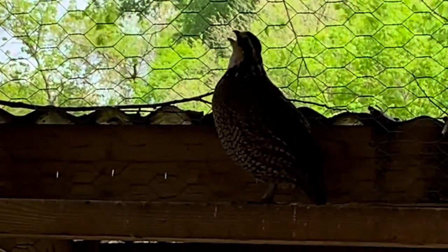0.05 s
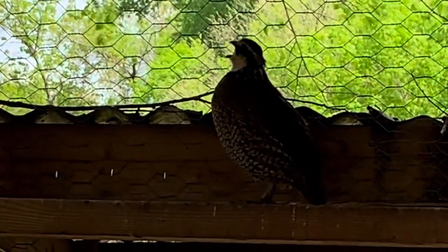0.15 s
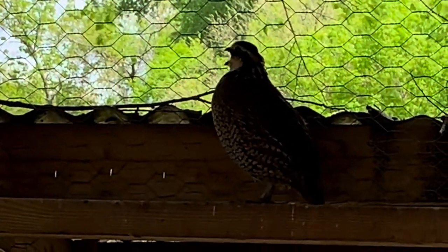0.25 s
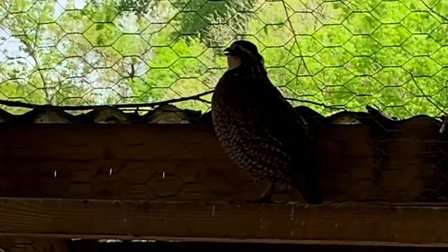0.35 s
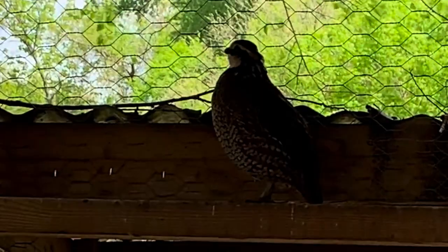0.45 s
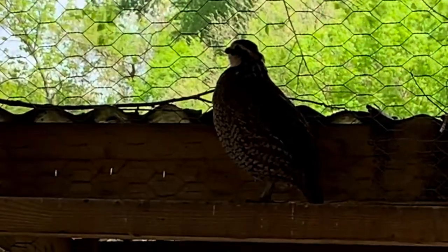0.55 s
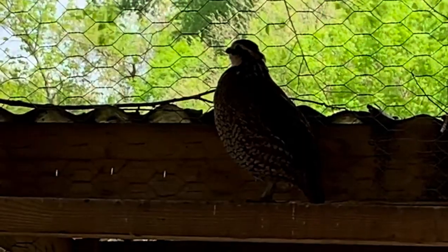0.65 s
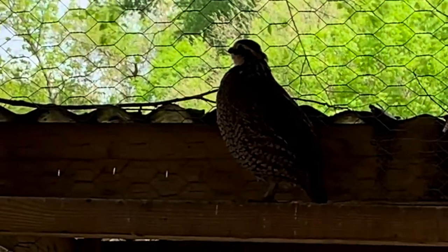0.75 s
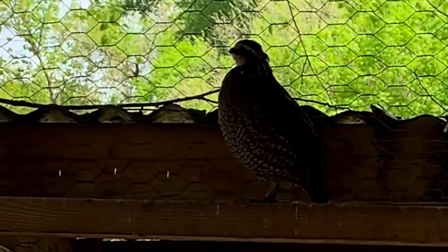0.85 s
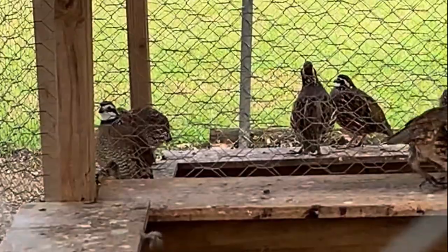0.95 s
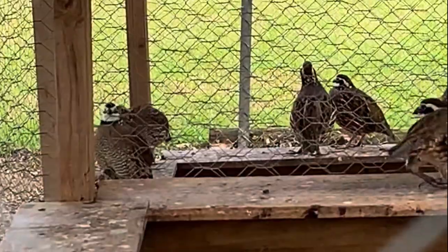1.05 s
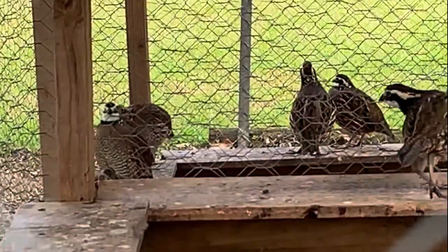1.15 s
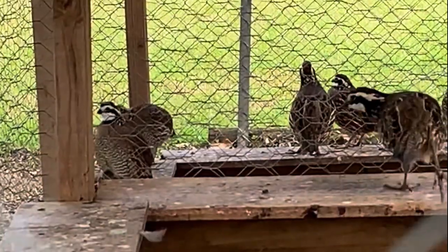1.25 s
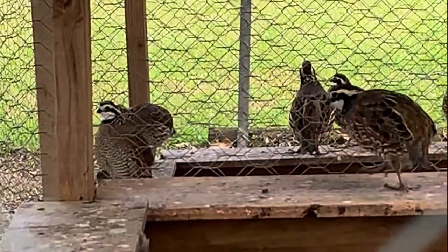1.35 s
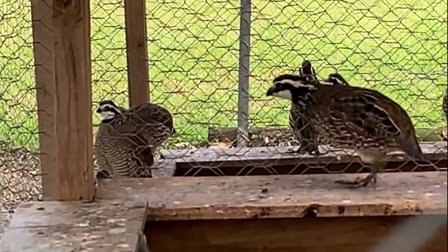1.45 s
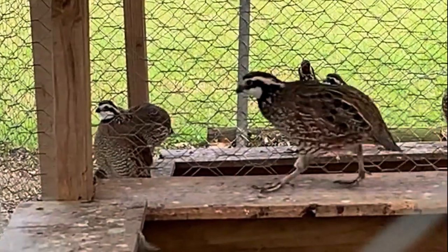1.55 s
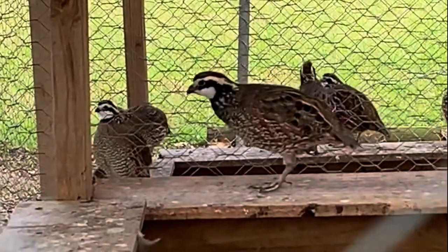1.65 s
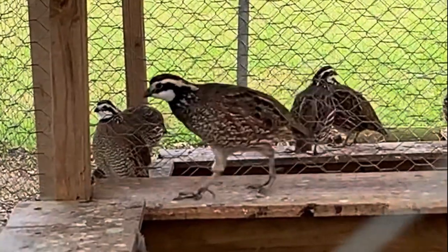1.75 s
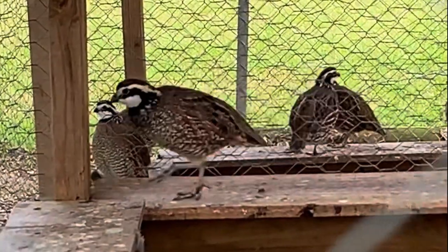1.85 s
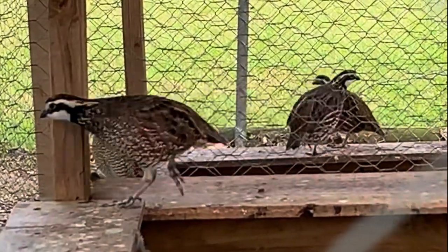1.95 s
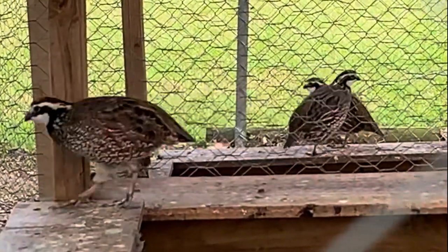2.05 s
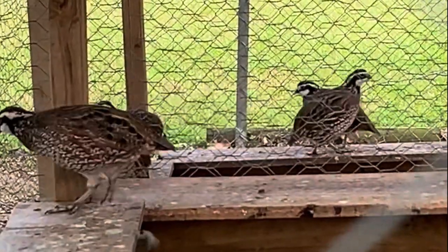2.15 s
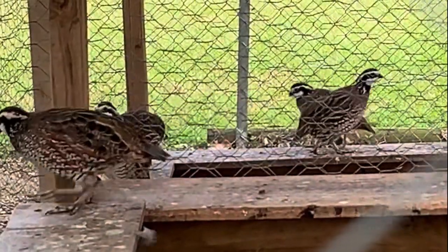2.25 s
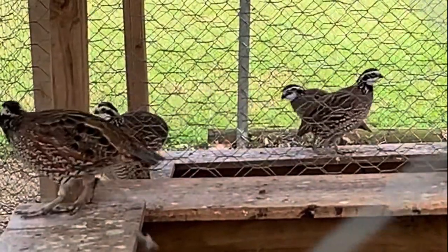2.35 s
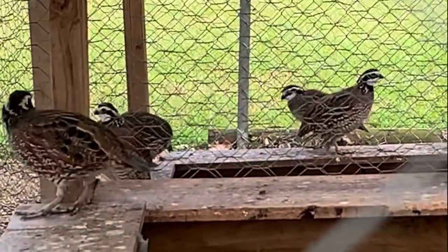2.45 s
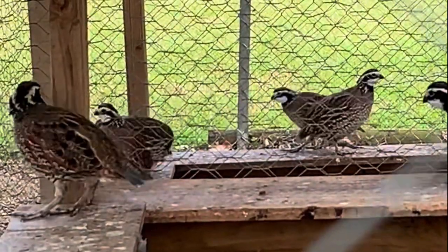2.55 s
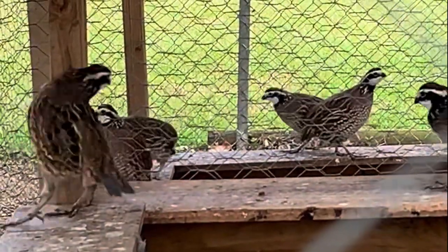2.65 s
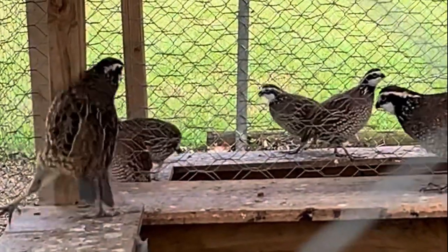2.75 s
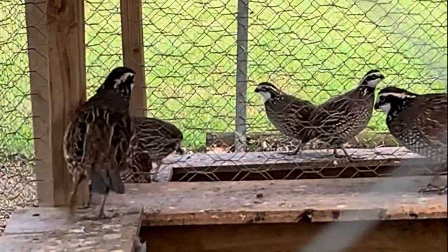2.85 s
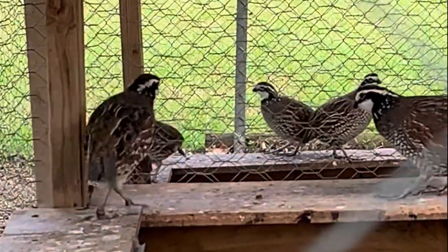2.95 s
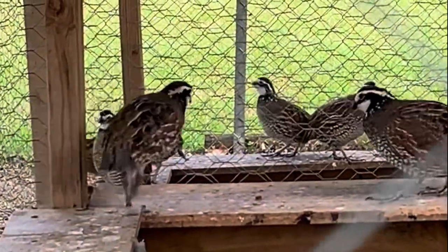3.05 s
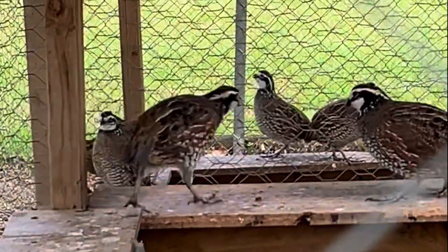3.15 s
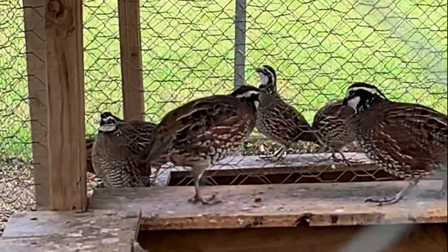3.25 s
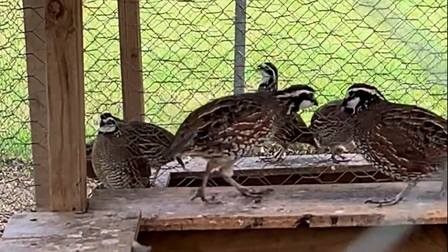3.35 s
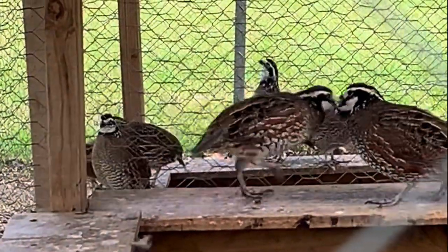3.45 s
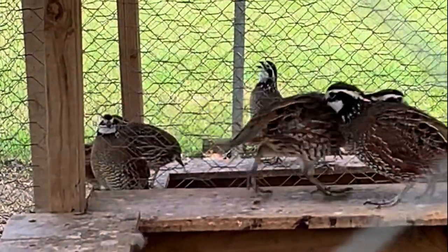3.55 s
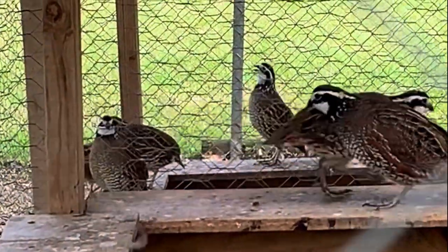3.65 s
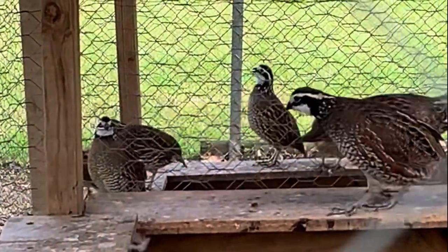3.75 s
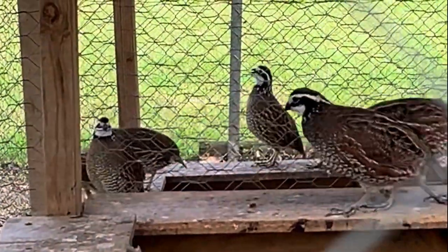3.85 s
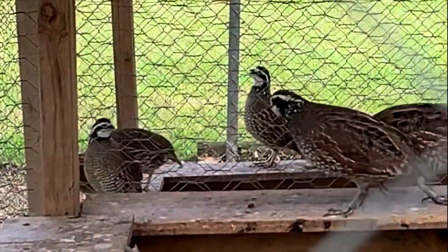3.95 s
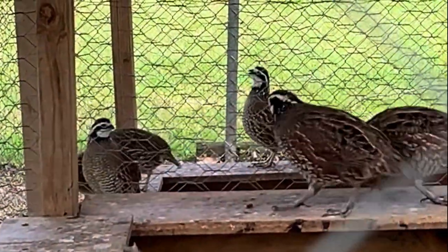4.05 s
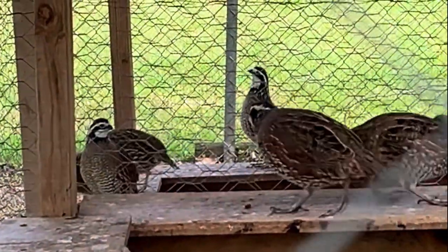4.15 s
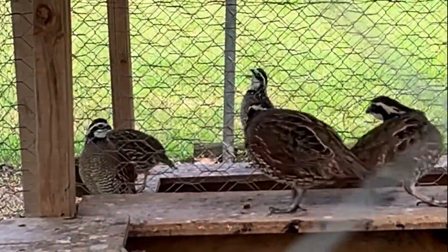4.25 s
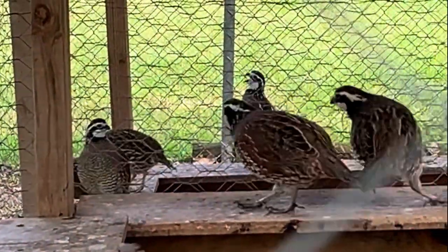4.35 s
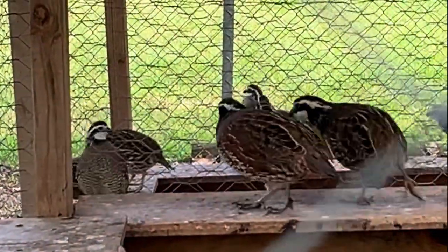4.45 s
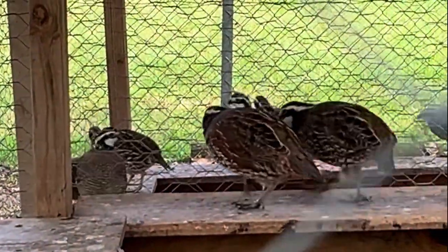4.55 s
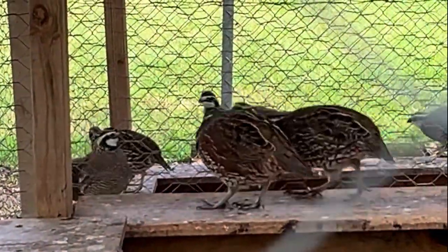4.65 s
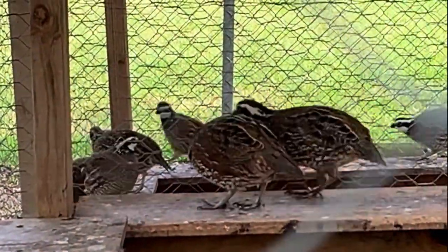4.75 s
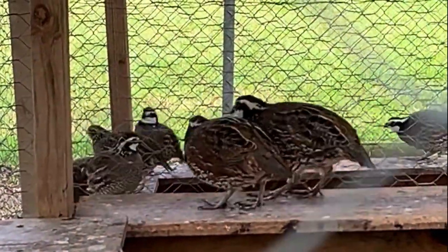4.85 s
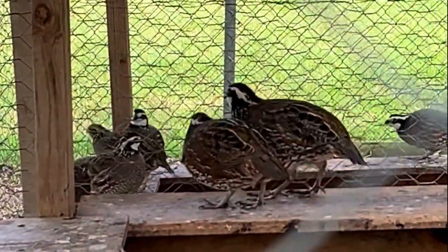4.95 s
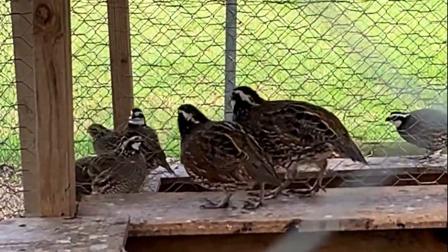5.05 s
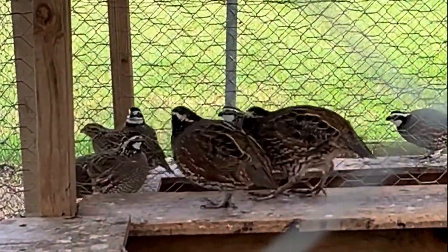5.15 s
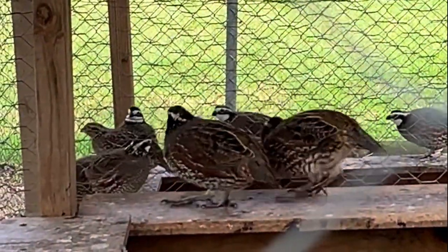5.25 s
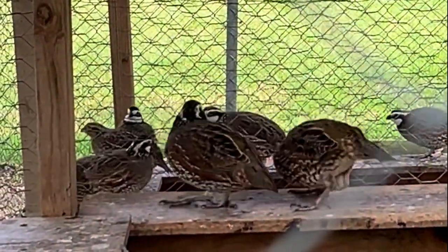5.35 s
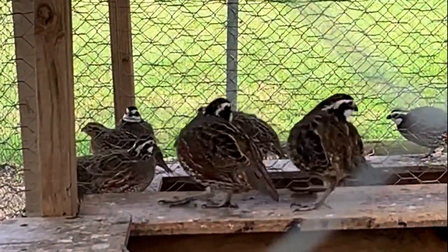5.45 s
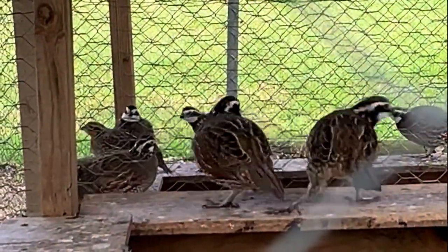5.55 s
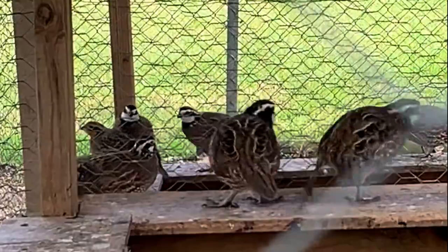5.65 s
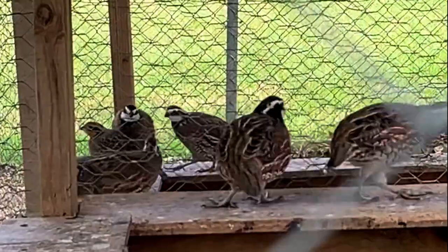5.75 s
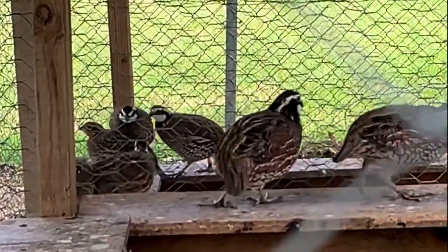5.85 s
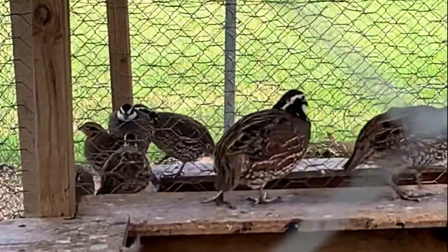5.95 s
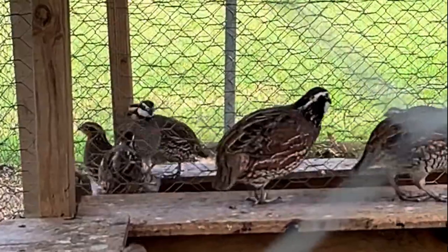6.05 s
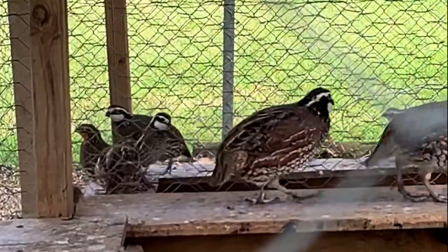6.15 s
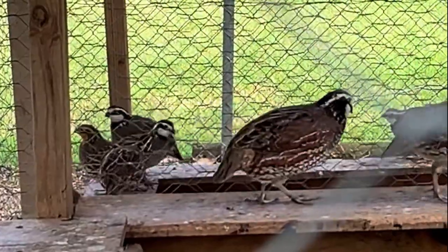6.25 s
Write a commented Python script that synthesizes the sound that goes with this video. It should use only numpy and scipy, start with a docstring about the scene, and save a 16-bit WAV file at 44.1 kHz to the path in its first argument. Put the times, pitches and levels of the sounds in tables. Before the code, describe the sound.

A quail's loud rising whistle cracks into a hoarse fall, then soft quick chirps and coos patter until two more sharp whistles ring out.

```python
"""Bobwhite quail in a wood and wire pen on a farm. A loud rising whistle opens and breaks into a hoarse fall.
At 0.9 s the background dips; from 1.1 s come three-part chirps and arched coos, with a faint far whistle at 2.7 s.
Loud whistles return at 3.5 and 4.2 s, the last breaking briefly, and two more chirps close. Voices are harmonic
stacks on gliding pitches, answered by boards and far walls; thin high notes and a 6 kHz scratch are sines.
Throughout, noise clicks make claw ticks and dull knocks, and shaped noise a flickering treble, air and low rumble."""
import sys
import numpy as np
from scipy import signal
from scipy.fft import rfft, irfft, next_fast_len
from scipy.io import wavfile
from scipy.ndimage import uniform_filter1d, minimum_filter1d, map_coordinates

SR = 44100
rng = np.random.default_rng(int(sys.argv[2]) if len(sys.argv) > 2 else 0)


def int16_out(signal):
    """Quantize to a 16-bit WAV file."""
    q = np.round(np.clip(np.atleast_2d(signal).T, -1, 1) * 32767)
    wavfile.write(sys.argv[1], SR, q.astype(np.int16))


N = 277830  # samples, 6.3 s

# Whistles, three near and one far; upsweep_hz may be negative, levels are before the pen's answer:
# start_s, length_s, pitch_hz, climb_hz_per_s, scoop_hz, upsweep_hz, onset_db, early_db, crest_db, end_db
WHISTLES = [(0.044, 0.13, 1676, 1953, 545.3, 743.5, -11.5, -18.5, -3.5, -7.5),
            (2.697, .14, 1565, -200, 110, 0.5, -55, -46, -49.5, -48.5),
            (3.519, .13, 1541, 1153, 181.5, -37.5, -17.5, -11.5, -13, -11),
            (4.224, 0.11, 1573, 2307, 304, 1077.5, -15.5, -7.5, -6.5, -9.5)]
# The voice breaking after a whistle; pitch_hz is where the plunge lands, before the sag:
# start_s, length_s, pitch_hz, burst_db, tail_db
BREAKS = [(0.169, 0.17, 1044, -15, -18.5), (4.331, 0.077, 832, -23.5, -28.5)]
# What throat and bill pass of a whistle's overtones, before a trim: frequency_hz, gain_db
WHISTLE_OVERTONES = [(2500, -18), (3400, -36), (4300, -22), (5000, -52), (6200, -44), (7200, -33.5),
                     (8000, -28), (9000, -41.5), (10000, -43), (12000, -57.5), (15000, -45.5)]
# What they pass of the broken voice, before a trim: frequency_hz, gain_db
HOARSE_COLOUR = [(800, -18.5), (1100, -9), (1700, -21.5), (2100, -17.5), (2600, 6), (3100, 1), (3700, -15),
                 (5500, -19), (7000, -28.5), (8500, -26), (11000, -33), (15000, -35.5)]


def whistles():
    """Almost pure gliding tones; after two of them the voice breaks into a falling, rough harmonic stack."""
    def whistle_colour(k, hz):
        return 0 if k == 1 else along(WHISTLE_OVERTONES, hz) - 1.5

    def hoarse_colour(k, hz):
        return along(HOARSE_COLOUR, hz) - 1

    out = np.zeros(N)
    for row in WHISTLES:
        call = syrinx(whistle(*row), whistle_colour,
                      jitter=.011, shimmer_db=1.1, rasp=.07, flutter_db=.3, hiss_db=-36)
        add(out, *call)
    for row in BREAKS:
        call = syrinx(voice_break(*row), hoarse_colour,
                      jitter=.022, shimmer_db=2.5, rasp=.14, flutter_db=2, hiss_db=-28)
        add(out, *call)
    return out


# a faint glide comes before the full voice
LEAD_IN_S, LEAD_IN_DB, ATTACK_S, RELEASE_S = .036, -25.5, 0.011, .009
SCOOP_S, SWEEP_S, SWEEP_BEFORE_END_S = 0.0046, .0068, .019
EARLY_SHARE, CREST_SHARE = 0.24, .55  # of a whistle's length


def whistle(s, length, hz, climb, scoop_hz, sweep_hz, onset_db, early_db, crest_db, end_db):
    """The pitch scoops up, drifts steadily and sweeps at the end: rows of start_s, pitch_hz, level_db."""
    t = np.arange(-LEAD_IN_S, length + RELEASE_S, 1 / SR)
    scoop = scoop_hz * step(-t / SCOOP_S)
    sweep = sweep_hz * step((t - length + SWEEP_BEFORE_END_S) / SWEEP_S)
    pitch = hz + climb * t - scoop + sweep
    faint_db = onset_db + LEAD_IN_DB
    level = envelope(
        t,
        (t[0], faint_db - 12.5), (-ATTACK_S / 2, faint_db),
        (ATTACK_S / 2, onset_db), (2 * ATTACK_S, onset_db),
        (EARLY_SHARE * length, early_db), (CREST_SHARE * length, crest_db),
        (length - 2 * SWEEP_BEFORE_END_S, end_db), (length - RELEASE_S / 2, end_db),
        (t[-1], end_db - 21))
    return np.column_stack([s + t, pitch, level])


BREAK_DROP_HZ, BREAK_DROP_S, BREAK_SAG_HZ_PER_S = 825, .024, 1280
BURST_ATTACK_S, BURST_S, BURST_RELEASE_S, BREAK_FADE_DB = .006, .02, .008, 17.5


def voice_break(s, length, hz, burst_db, tail_db):
    """A harsh burst on a plunging pitch, then a sagging, fading tail."""
    t = np.arange(0, length, 1 / SR)
    plunge = BREAK_DROP_HZ * np.exp(-(t / BREAK_DROP_S) ** 2)
    pitch = hz + plunge - BREAK_SAG_HZ_PER_S * t
    level = envelope(
        t,
        (0, burst_db - 13.5), (BURST_ATTACK_S, burst_db), (BURST_S, burst_db),
        (BURST_S + BURST_RELEASE_S, tail_db - 8),
        (length / 3, tail_db), (length, tail_db - BREAK_FADE_DB))
    return np.column_stack([s + t, pitch, level])


SKIRT_PER_PARTIAL = .11  # extra roughness of each higher partial


def syrinx(track_rows, partial_db, jitter, shimmer_db, rasp, flutter_db, hiss_db, count=12):
    """One call as (start s, sound): a harmonic stack on a gliding, slightly shaky pitch."""
    s, hz, db = np.transpose(track_rows)
    s = np.maximum.accumulate(s)
    t = np.arange(s[0], s[-1], 1 / SR)
    pitch = uniform_filter1d(np.interp(t, s, hz), size=160)
    # the membranes lose their steadiness in fast glides
    glide = uniform_filter1d(np.abs(np.gradient(np.log(pitch))) * SR, size=400)
    unsteady = 0.018 + np.minimum(glide / 9, 1)
    pitch = pitch * (1 + jitter * unsteady * wobble(700, len(t)))
    phase = 2 * np.pi * np.cumsum(pitch) / SR
    # bright hiss of air through the bill
    stack = amp(hiss_db) * unsteady * np.diff(rng.standard_normal(len(t) + 1))
    for k in range(1, count + 1):
        # turbulence spreads each partial into a noisy skirt, the high ones most
        roughness = rasp * (unsteady + SKIRT_PER_PARTIAL * (k - 1)) * k
        carrier = 1 + roughness * (wobble(1100, len(t)) + 1j * wobble(1100, len(t)))
        carrier = carrier / np.sqrt(np.mean(np.abs(carrier) ** 2))
        gain = amp(partial_db(k, k * pitch) + flutter_db * wobble(89.8, len(t)))
        gain = gain * (k * pitch < SR / 2)
        stack += gain * np.imag(carrier * np.exp(1j * k * phase))
    fade = np.clip(np.minimum(t - s[0], s[-1] - t) / 0.0018, 0, 1)
    level_db = np.interp(t, s, db) + shimmer_db * unsteady * wobble(400, len(t))
    return s[0], stack * fade * amp(level_db)


# Chirps, a sharp pit, a held note and a falling slur; levels are before the voice colour and waver:
# pit_s, start_pitch_hz, held_pitch_hz, pit_db, held_db, slur_start_s, slur_db
CHIRPS = [(1.142, 2060, 1246, -23, -26.5, 1.207, -33.5), (1.457, 2060, 1265, -25.5, -31, 1.529, -37.5),
          (1.792, 2060, 1250, -25.5, -31.5, 1.874, -38), (2.148, 2060, 1240, -24, -29.5, 2.221, -38.5),
          (2.487, 2100, 1263, -27, -31, 2.569, -37.5), (2.843, 2100, 1284, -27, -30.5, 2.916, -39),
          (3.188, 2060, 1312, -27, -33, 3.25, -57.5), (3.484, 2600, 2084, -28.5, -37.5, 3.592, -37.5),
          (3.775, 2800, 2420, -14.5, -43.5, 3.868, -45), (5.656, 2150, 1283, -42, -34.5, 5.724, -36),
          (6.008, 2200, 1268, -31, -31, 6.087, -41)]
# Arched coos, after the chirps and from the covey; length_s is the fall after the top:
# top_s, top_pitch_hz, length_s, droop_share, level_db
COOS = [(0.951, 853, 0.018, .05, -44), (1.102, 843, .06, 0.089, -49), (1.287, 903, .055, 0.24, -31.5),
        (1.638, 905, 0.045, 0.32, -33.5), (1.965, 847.5, 0.062, 0.17, -34.5), (2.311, 876, .055, .3, -32.5),
        (2.666, 963, .05, 0.36, -31.5), (2.99, 1016, 0.054, 0.27, -33), (3.175, 660, .08, 0.22, -40),
        (3.239, 2030, .025, 0.3, -38), (3.292, 1412, .07, 0.42, -31.5), (5.259, 681, .06, 0.145, -45),
        (5.334, 742, .05, 0.28, -46), (5.41, 639, .09, 0.11, -42.5), (5.539, 1830, 0.067, 0.6, -44),
        (5.83, 902, 0.055, 0.29, -35), (6.177, 932, 0.037, 0.25, -37)]
# What throat and bill pass of the soft voice, before tilt and trims: frequency_hz, gain_db
SOFT_COLOUR = [(550, -3), (850, -2), (1100, -8), (1290, -6), (1400, -1.5), (1750, 3), (2100, 3),
               (2560, 4.5), (2800, -8.5), (3200, -16), (4200, -12.5), (4900, -33), (6500, -15.5),
               (8000, -34), (14000, -24.5)]


def soft_calls(tilt_db=6.0):
    """Soft contact calls, chirps and arched coos, sung by the same harmonic voice with a breathier tone."""
    def colour(k, hz):
        # the first two partials are strong, the rest fall away
        return along(SOFT_COLOUR, hz) - 3.5 - tilt_db * np.log2(k) - 7 * (k > 2) + 3 * (k == 2)

    calls = [chirp(*row) for row in CHIRPS]
    calls += [coo(*row) for row in [*COOS, *murmurs()]]
    out = np.zeros(N)
    for rows in calls:
        call = syrinx(wavering(rows), colour,
                      jitter=.026, shimmer_db=2.6, rasp=.17, flutter_db=2.2, hiss_db=-32)
        add(out, *call)
    return out


PIT_LEAD_S, PIT_ATTACK_S, PIT_SWELL_DB = .022, 0.0065, 7.5
PIT_DROP_S, PIT_SAG_HZ_PER_S, PIT_DECAY_S = 0.0022, 13000, 0.004
HOLD_RELEASE_S, REBOUND_HZ_PER_S = 0.043, 3000
# the slur sinks towards this share of the held pitch
SLUR_SHARE, SLUR_FALL_S, SLUR_S, SLUR_FADE_DB = .39, .013, .065, 5.5


def chirp(s, start_hz, held_hz, pit_db, held_db, slur_s, slur_db):
    """The pit snaps down to a held note that creeps up, then slurs away below."""
    hold = slur_s - s
    t = np.arange(-PIT_LEAD_S, hold + SLUR_S, 1 / SR)
    dropped = step(t / PIT_DROP_S)
    pit = start_hz - PIT_SAG_HZ_PER_S * t
    held = held_hz + REBOUND_HZ_PER_S * np.minimum(t, hold)
    slur = SLUR_SHARE + (1 - SLUR_SHARE) * np.exp(-np.maximum(t - hold, 0) / SLUR_FALL_S)
    pitch = ((1 - dropped) * pit + dropped * held) * slur
    level = envelope(
        t,
        (t[0], pit_db - 2 * PIT_SWELL_DB), (-2 * PIT_ATTACK_S, pit_db - PIT_SWELL_DB),
        (-PIT_ATTACK_S, pit_db), (PIT_DECAY_S, held_db),
        (hold - HOLD_RELEASE_S, held_db), (hold, slur_db), (t[-1], slur_db - SLUR_FADE_DB))
    return np.column_stack([s + t, pitch, level])


# run-up and width of the arch as shares of the length; fade at both ends
COO_RISE_SHARE, COO_ARCH_SHARE, COO_EDGE_DB = .4, .65, 19.5
COO_ATTACK_S, COO_SWELL_DB = 0.0069, 6.5  # a sudden swell near the top


def coo(s, hz, length, droop, db):
    """A quick rise and a slower fall of pitch; the level fades at both ends."""
    t = np.arange(-COO_RISE_SHARE * length, length, 1 / SR)
    arch = np.exp(-(t / (COO_ARCH_SHARE * length)) ** 2)
    pitch = hz * (1 - droop * (1 - arch))
    attack = envelope(
        t, (t[0], db - COO_EDGE_DB), (-2 * COO_ATTACK_S, db - COO_SWELL_DB), (-COO_ATTACK_S, db))
    fade = COO_EDGE_DB * (np.maximum(t, 0) / length) ** 3
    return np.column_stack([s + t, pitch, attack - fade])


# Faint coos, a row of least and a row of most values:
# top_s, top_pitch_hz, length_s, droop_share, level_db
MURMUR_RANGE = [(1.0, 546, 0.044, 0.11, -50), (6.2, 1213, 0.08, .4, -48.5)]


def murmurs(count=14):
    """Faint coos at random moments, as rows for coo()."""
    return rng.uniform(*MURMUR_RANGE, (count, len(MURMUR_RANGE[0])))


def wavering(rows):
    """No two soft calls are quite alike: slow random drift of pitch and level."""
    s, hz, db = rows.T
    pitch = hz * (1 + 0.01235 * wobble(60, len(s)))
    return np.column_stack([s, pitch, db + 1.5 * wobble(90, len(s))])


# Thin high notes and one short 6 kHz scratch; length_s is half the whole sound:
# middle_s, pitch_hz, length_s, level_db
HIGH_NOTES = [(0.846, 7100, 0.047, -57), (2.262, 7555, 0.12, -62), (2.896, 6070, 0.035, -42),
              (5.877, 8600, 0.062, -64)]


def high_notes():
    """Thin high notes and a short scratch: sines of unsteady pitch under a rounded swell."""
    out = np.zeros(N)
    for s, hz, length, db in HIGH_NOTES:
        size = int(2 * length * SR)
        phase = 2 * np.pi * np.cumsum(hz * (1 + 0.085 * wobble(1200, size))) / SR
        add(out, s - length, amp(db) * np.hanning(size) * np.sin(phase))
    return out


# Single echoes off nearby boards: delay_s, level_db
ECHOES = [(.0045, -26.5), (0.0099, -13), (0.018, -14.5)]
# Far buildings, rough enough to blur their answer; the blur begins 5 ms after: delay_s, level_db
WALLS = [(.108, -29.5), (.305, -36.5)]
WALL_BLUR_S = 0.16  # t60
# Ring of the pen's boards: frequency_hz, t60_s
BOARDS = [(800, 0.041), (1800, 0.06), (2100, 0.17), (2400, 0.032), (4000, 0.07)]
# Long tail of the yard: frequency_hz, t60_s
YARD = [(300, 0.24), (1700, 0.83), (3000, .65), (8000, .55), (15000, 0.32)]


def pen(x, near_db, far_db):
    """Direct sound, single echoes, the short ring of the pen, the tail of the yard and far walls."""
    ring = tail(x, lambda hz: along(BOARDS, hz))
    yard = tail(x, lambda hz: along(YARD, hz))
    out = x + amp(near_db) * ring + amp(far_db) * yard
    for delay, db in ECHOES:
        add(out, delay, amp(db) * x)
    for delay, db in WALLS:
        add(out, delay, amp(db) * tail(x, lambda hz: np.full(hz.shape, WALL_BLUR_S)))
    return out


def tail(x, t60, apart=.35):
    """A diffuse answer, noise dying at t60 (a function of frequency), of energy 1 in its middle part."""
    hz, t, z = signal.stft(rng.standard_normal((2, SR)), SR, nperseg=256)
    decay = signal.istft(z * amp(-60 * t / t60(hz)[:, None]), SR, nperseg=256)[1]
    decay = decay / np.linalg.norm(decay[0])
    late = np.pad(x, (220, 0))  # 5 ms behind the direct sound
    mid, side = signal.fftconvolve(late[None], decay, axes=1)[:, :N]
    return np.array([mid + apart * side, mid - apart * side])


# The sharpest claw ticks on wire and grit, before a common gain: start_s, level_db
TICKS = [(.5322, -34.5), (.7537, -34.5), (1.2421, -33.5), (2.5965, -39), (2.8848, -33), (3.3034, -37),
         (3.3927, -38), (4.0282, -34.5), (4.6089, -32), (4.8768, -43), (5.1352, -35.5)]
# Colour of a claw tick: frequency_hz, relative_db
CLAW = [(1500, -3.5), (3500, -2.5), (6500, -0.5), (9000, -1), (12000, -2), (15500, 5.5)]


def claw_ticks():
    """Hard claws on wire and grit: very short bright clicks with a scrape."""
    events = np.vstack([TICKS, grit(mean_db=-49.0, spread_db=10.5)])
    return contacts(events, CLAW, t60=0.009, scrape_db=-1.5, scrape_t60=0.071, gain_db=-5.5)


def grit(mean_db, spread_db, count=45):
    """Faint ticks at random moments: rows of start_s, level_db."""
    return rng.random((count, 2)) * [N / SR, spread_db] + [0, mean_db - spread_db / 2]


# Dull knocks, before a common gain: start_s, level_db
KNOCKS = [(.365, -26), (.5, -33.5), (1.022, -36), (1.937, -36.5), (2.092, -42), (2.772, -34), (4.805, -41),
          (5.184, -36)]
# Colour of a dull knock: frequency_hz, relative_db
KNOCK_COLOUR = [(150, -12), (700, -3), (1600, 9), (2500, 1), (3700, -0.5), (5000, -9.5), (14000, -23.5)]


def dull_knocks():
    """Knocks duller and slightly longer than the ticks, with a woody middle."""
    return contacts(KNOCKS, KNOCK_COLOUR, t60=0.021, scrape_db=0.5, scrape_t60=0.11, gain_db=-10.5)


def contacts(events, colour, t60, scrape_db, scrape_t60, gain_db):
    """Each contact is coloured noise: a dry click with a longer, grainy scrape."""
    out, t = np.zeros((2, N)), np.arange(SR // 5) / SR
    for s, db in events:
        click = amp(-60 * t / t60)
        scrape = amp(scrape_db - 60 * t / scrape_t60 + 1.3 * wobble(300, len(t)))
        add(out, s, amp(db + gain_db) * noise(colour, len(t)) * (click + scrape))
    return out


# Slow swells of the treble, on top of its steady level: middle_s, length_s, level_db
TREBLE_SWELLS = [(0.711, 0.35, -57), (1.15, 0.39, -60), (2.123, 0.37, -64.5), (2.655, 0.43, -62.5),
                 (3.684, 0.75, -60.5), (4.481, .45, -54.5), (5.372, 0.48, -57.5), (6.103, .2, -61)]
# Colour of the treble noise: frequency_hz, relative_db
TREBLE = [(1500, -21), (4000, -5.5), (6500, -1), (8000, -7.5), (11000, -4.5), (15500, -1)]
TREBLE_DB, TREBLE_FLICKER_DB = -67.5, 7


def flickering_treble(dip_db):
    """Bright noise of randomly flickering level, with slow swells."""
    body = amp(TREBLE_DB) + sum(amp(db) * swell(s, length) for s, length, db in TREBLE_SWELLS)
    flicker_db = TREBLE_FLICKER_DB * np.tanh(wobble(30, N))
    return body * amp(dip_db + flicker_db) * noise(TREBLE, N, apart=0.033)


# Colour of the even air: frequency_hz, relative_db
AIR = [(100, -13.5), (300, 3.5), (480, 0), (750, 4.5), (1100, 1.5), (1600, 0.5), (2500, -8.5), (3500, -9.5),
       (5000, -29.5), (8000, -34), (15000, -30)]
AIR_DB, EARLY_AIR_DB = -52, -3  # the second is added before the dip


def air(early, dip_db):
    """Even outdoor air: broad noise of gently wandering level."""
    level_db = AIR_DB + EARLY_AIR_DB * early + dip_db + 0.92 * wobble(6.8, N)
    return amp(level_db) * noise(AIR, N, apart=0.32)


# Colour of the deep rumble: frequency_hz, relative_db
RUMBLE = [(12, -36.5), (20, -10), (59, 4.5), (130, -10.5), (170, -38.5), (290, -120)]
# Colour of the dull thud band above it: frequency_hz, relative_db
THUD = [(70, -28.5), (120, 3.5), (170, -3.5), (240, -5), (330, -15.5), (600, -39), (1200, -83)]
# Dull bumps; level_db is in the thud band, the rumble adds a gain: middle_s, length_s, level_db
BUMPS = [(3.003, 0.13, -45), (3.17, 0.018, -38), (3.288, 0.015, -38), (4.402, 0.039, -38),
         (5.875, 0.075, -39.5), (5.949, 0.057, -35)]
RUMBLE_DB, RUMBLE_SWING_DB, THUD_DB, BUMP_RUMBLE_DB = -41, 2.5, -50.5, 2.5
EARLY_LOW_DB = -5.5  # added before the dip


def low_rumble(early, dip_db):
    """Two bands of low noise of wandering level, both swelling with the bumps."""
    low_db = EARLY_LOW_DB * early + dip_db
    bumps = sum(amp(db) * swell(s, length) for s, length, db in BUMPS)
    rumble_gain = amp(RUMBLE_DB + low_db + RUMBLE_SWING_DB * wobble(12, N))
    rumble = (rumble_gain + amp(BUMP_RUMBLE_DB) * bumps) * noise(RUMBLE, N, apart=.17)
    thud_gain = amp(THUD_DB + low_db + 2 * wobble(25, N))
    thud = (thud_gain + bumps) * noise(THUD, N, apart=0.25)
    return rumble + thud


DIP_S, DIP_WIDTH_S, DIP_DB = .932, .028, -18


def background():
    """Treble, air and rumble; they dip briefly together, and air and rumble are quieter before the dip."""
    early = np.arange(N) / SR < DIP_S
    dip_db = DIP_DB * swell(DIP_S, DIP_WIDTH_S)
    return low_rumble(early, dip_db) + flickering_treble(dip_db) + air(early, dip_db)


def amp(db):
    """Decibels to gain."""
    return 10 ** (np.asarray(db) / 20)


def unit(x):
    """x at rms 1."""
    return x / np.sqrt(np.mean(x ** 2) + 1e-20)


def along(points, hz):
    """Read (frequency_hz, value) points on a log frequency axis."""
    f, v = np.transpose(points)
    return np.interp(np.log(hz + 1), np.log(f + 1), v)


def wobble(rate, size):
    """A smooth random curve, rate knots a second."""
    knots = rng.standard_normal(int(size * rate / SR) + 4)
    return map_coordinates(knots, [np.arange(size) * rate / SR])


def step(u):
    """A smooth step from 0 to 1 around u = 0."""
    return .5 + .5 * np.tanh(u / 2)


def swell(s, length):
    """A bell around time s, length seconds wide at 1/e of its top, one value per sample."""
    return np.exp(-(2 * (np.arange(N) / SR - s) / length) ** 2)


def envelope(t, *corners):
    """Straight lines through (time_s, level_db) corners."""
    s, db = np.transpose(corners)
    return np.interp(t, np.maximum.accumulate(s), db)


def filtered(x, response):
    """x times a response of frequency."""
    size = x.shape[-1]
    m = next_fast_len(size + 8192)
    return irfft(rfft(x, m) * response(np.fft.rfftfreq(m, 1 / SR)), m)[..., :size]


def noise(spectrum, size, apart=0.1):
    """Coloured stereo noise of rms 1, mostly shared by the two sides."""
    white = rng.standard_normal((2, size))
    mid, side = filtered(white, lambda hz: amp(along(spectrum, hz)))
    return unit(np.array([mid + apart * side, mid - apart * side]))


def add(track, s, sound):
    """Mix a sound into a track at time s."""
    start = int(np.clip(round(s * SR), 0, N - 1))
    track[..., start:start + sound.shape[-1]] += sound[..., :N - start]


def scene():
    """Calls in the pen, ticks, knocks and the background."""
    loud = pen(whistles(), near_db=-16, far_db=-19.5)
    soft = pen(soft_calls() + high_notes(), near_db=-5.5, far_db=-19)
    return loud + soft + claw_ticks() + dull_knocks() + background()


# The microphone pair, how far the left port leads the right: frequency_hz, lead_rad
LEAD = [(0, 0), (1300, .05), (1700, .5), (2000, .5), (2400, 1.15), (3700, 1.3), (4750, 3.14), (15900, 19.3)]
TOP_HZ = 15900


def record(dry):
    """Two close ports, the left one leading, a peak limiter and a steep band limit."""
    def port_phase(hz):
        lead = np.interp(hz, *np.transpose(LEAD))
        return np.exp(1j * np.outer([.5, -.5], lead))

    ports = filtered(dry, port_phase)
    needed = np.minimum(1, .98 / (np.abs(ports).max(axis=0) + 1e-9))
    gain = uniform_filter1d(minimum_filter1d(needed, size=400), size=300)
    return filtered(ports * gain, lambda hz: hz < TOP_HZ)


dry = scene()
out = record(dry)
int16_out(out)
```